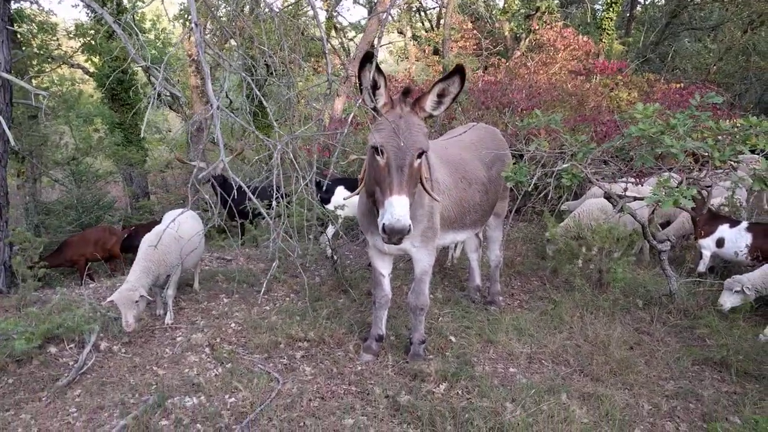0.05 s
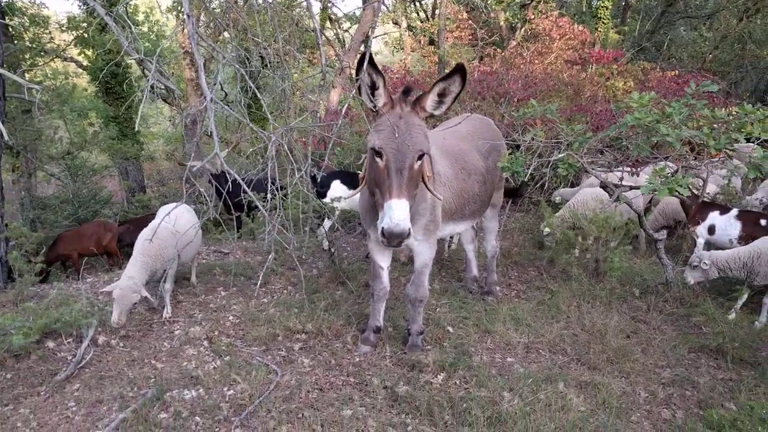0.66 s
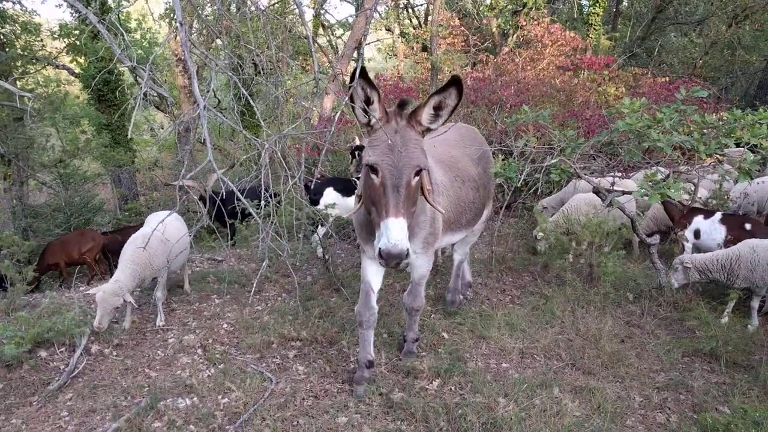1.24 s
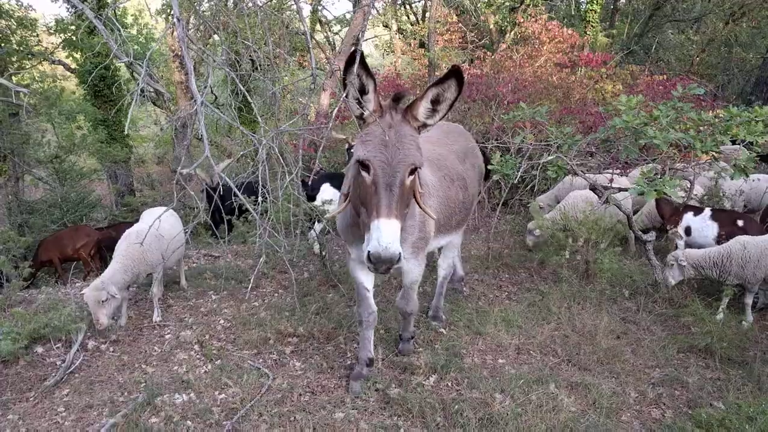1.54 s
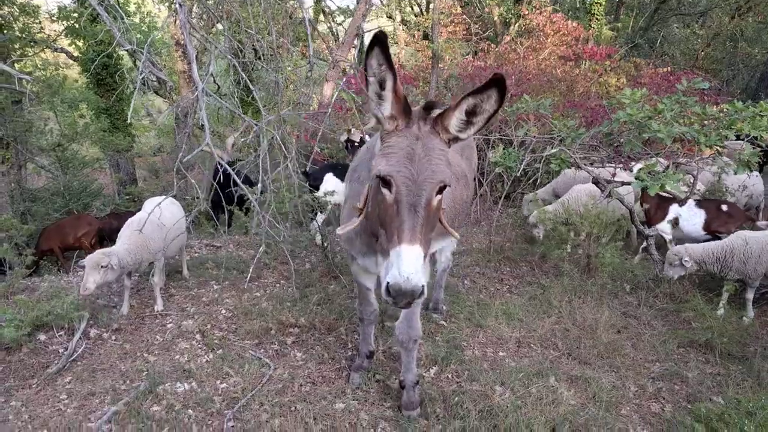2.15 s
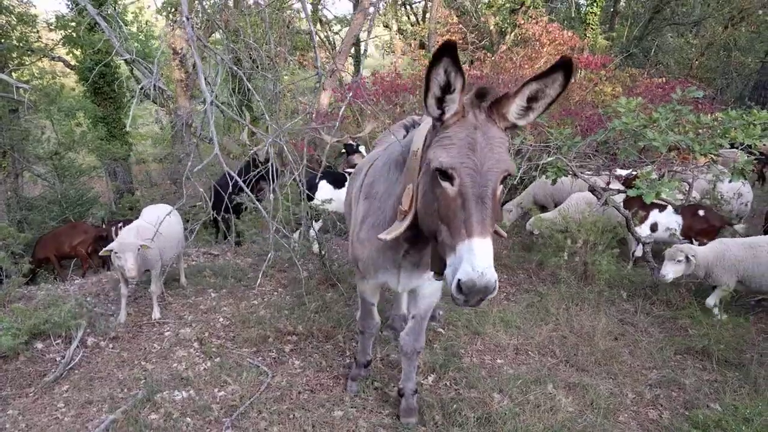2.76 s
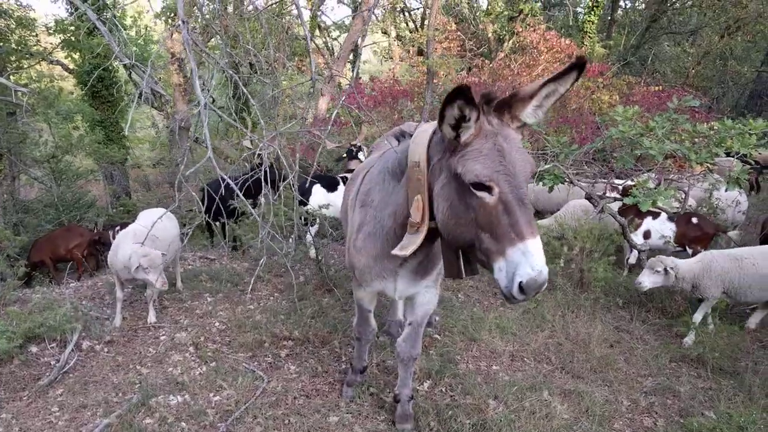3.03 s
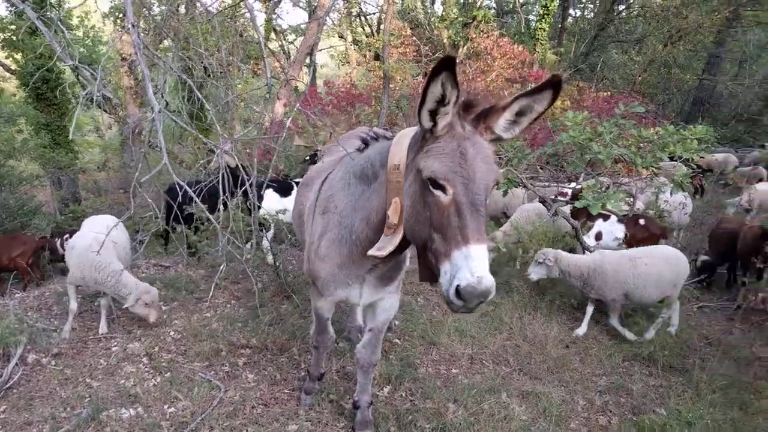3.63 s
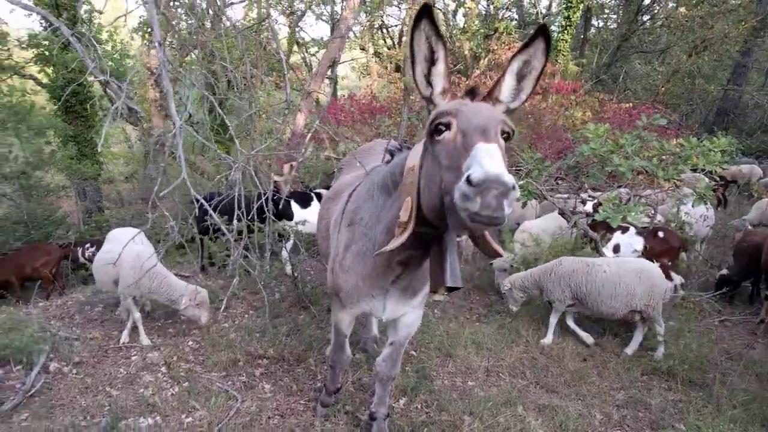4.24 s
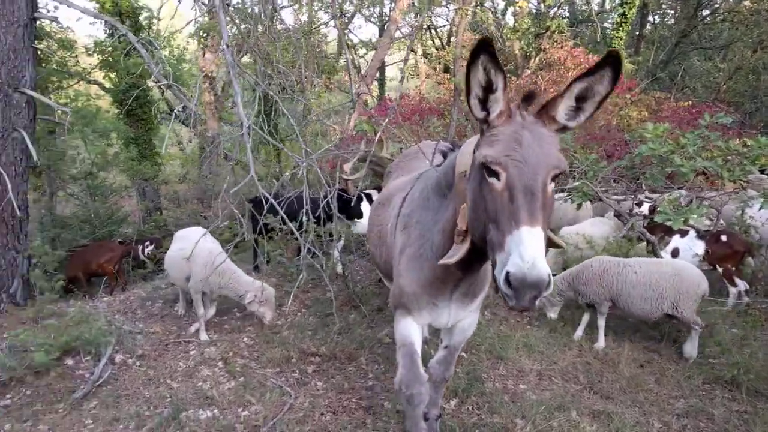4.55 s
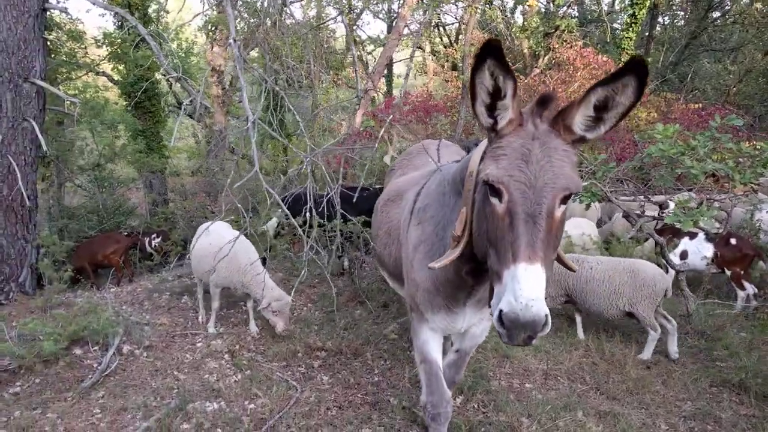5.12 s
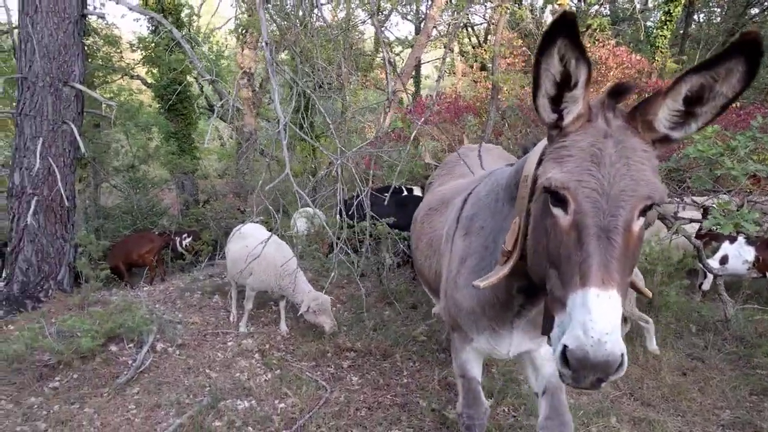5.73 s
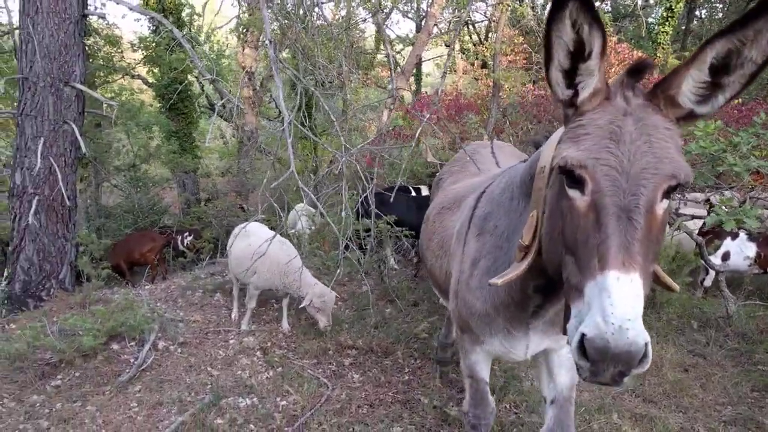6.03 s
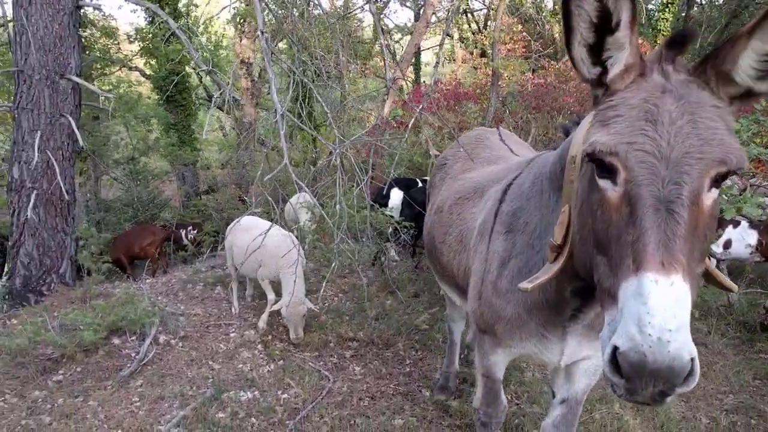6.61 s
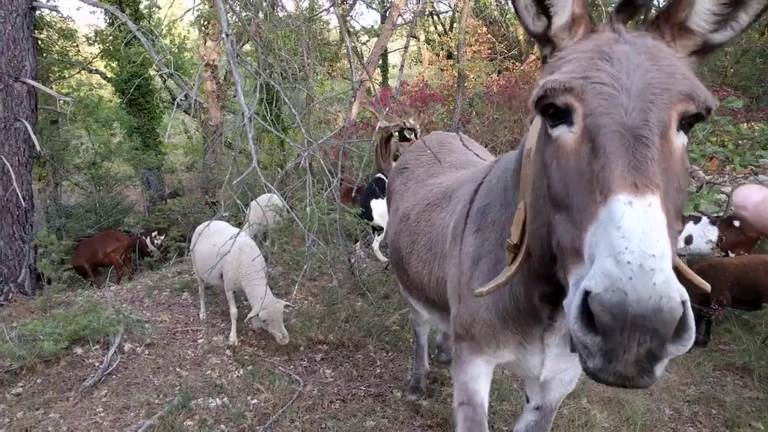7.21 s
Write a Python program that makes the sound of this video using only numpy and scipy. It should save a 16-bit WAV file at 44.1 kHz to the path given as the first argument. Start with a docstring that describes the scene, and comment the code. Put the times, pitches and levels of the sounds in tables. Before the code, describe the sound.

A herd grazes around the microphone in a wooded clearing. Small bright bells and hollow clonks sound first, then a donkey's sheet-metal bell joins close up, clanking irregularly until shortly before the end. Distant bells jangle among the trees, swelling and then thinning. Underneath runs a steady crisp rustle of dry leaves, broken by occasional hoof crunches, dull steps and sharp twig snaps.

```python
"""A wooded clearing, one microphone among a grazing herd. Close by, the clapper of a donkey's
sheet-iron bell clanks at every nod. Brighter goat and sheep bells ring near it, mixed with
low hollow clonks, and the rest of the flock jangles from among the trees.
Many hooves keep the dry leaves crackling, snap twigs and thud on the soil.
The trunks return a thin echo of the bells, and the wood murmurs in the distance."""
import sys
import numpy as np
from scipy import signal
from scipy.fft import rfft, irfft
from scipy.io import wavfile

SR = 44100
rng = np.random.default_rng(int(sys.argv[2]) if len(sys.argv) > 2 else 0)


def generate_wav(signal):
    """Clip the signal to [-1, 1] and save it as 16-bit WAV at the path in sys.argv[1]."""
    frames = np.transpose(np.atleast_2d(signal))
    scaled = np.clip(frames, -1, 1) * 32767
    pcm = np.round(scaled).astype(np.int16)
    wavfile.write(sys.argv[1], SR, pcm)


N = 325017
TIME = np.arange(N) / SR


# donkey bell modes by family (hollow note, knock, flat face, rim, waist, sheen): f/Hz, level/dB, t60/s
DONKEY_BELL_MODES = [
    [(463, .5, .34), (492, -1, .17), (515, -2, .12), (555, -5, .08), (640, -14, .12), (2401, -17, .42),
     (5459, -13, .26)],
    [(1399, 0, .25), (1424, -4, .22)],
    [(1997, -2, .62), (2713, -3, .55), (3171, -7, .42), (3548, 0, .26), (4732, -15, .42)],
    [(1093, -18, 1.7), (1330, 0, .42), (1890, -8, 3), (2961, -10, .7), (3957, -7, .8), (4856, -8, .7),
     (5590, -6, .7), (6826, -5, .42)],
    [(829, -6, .8), (1674, -17, .55), (5670, -3.5, .6), (7354, -2, .33)],
    [(4517, -22, .9), (7547, -2, .33), (8807, -21, .4), (12200, -22, .11)],
]
# clapper blows, whose landing point sets each family's drive: t/s, then level/dB per family
DONKEY_BELL_BLOWS = [(1.206, -32.5, -42, -55, -48, -45, -58), (1.381, -25, -38, -33.5, -50, -40, -29.5),
                     (1.497, -34, -33, -45, -58, -43, -38), (1.58, -45, -35, -45.5, -50, -60, -58),
                     (1.615, -66, -52, -65, -62, -71, -63), (2.236, -23.5, -40, -33.5, -38.5, -31.5, -30),
                     (2.446, -31, -33, -47.5, -47, -40, -42), (2.918, -27, -44, -40, -43.5, -31, -21),
                     (2.993, -35, -34.5, -47, -42.5, -40, -57), (3.324, -28, -34, -39.5, -39, -35.5, -16),
                     (3.528, -33, -46, -42.5, -42.5, -40, -28), (3.625, -32, -59, -58, -70, -51, -60),
                     (3.668, -30.5, -41, -58, -33, -31.5, -19.5), (4.088, -32, -30.5, -64, -46, -37, -44),
                     (4.122, -62, -33, -67, -71, -44, -60), (4.532, -32, -26.5, -44, -46, -43, -59),
                     (4.588, -31.5, -31.5, -46, -46, -36.5, -32), (4.728, -33.5, -46, -52, -44, -36, -32),
                     (4.89, -33, -41, -44, -53, -35, -38), (4.937, -35, -33, -54, -48, -40.5, -35),
                     (5.051, -37.5, -35.5, -54, -59, -46.5, -46), (5.273, -34.5, -42, -50, -56, -47.5, -51),
                     (5.833, -27.5, -43, -45, -61, -36, -28.5), (5.885, -36, -33.5, -60, -39, -37, -36),
                     (5.932, -42, -33, -48.5, -46.5, -42, -50), (6.179, -29, -41.5, -43, -51, -37.5, -33),
                     (6.223, -37, -34.5, -77, -59, -49, -53)]
# spectrum of the walls' dull clack: f/Hz, level/dB
CLACK_SPECTRUM = [(300, -25), (1400, -2), (3300, -4.5), (7000, -17)]

def donkey_bell(jangle_db=-35, jangle_growth=.5, hard_blow_db=-22, cutoff_hz=456):
    """Close up: the clapper rings the walls; a hard contact adds jangle, a flat one a dull clack."""
    walls = bell(DONKEY_BELL_MODES, DONKEY_BELL_BLOWS, scatter_db=1.5, choke_db=-15, swing_s=.4)
    # the bell is too small to radiate below the cutoff
    radiated = signal.sosfilt(signal.butter(4, cutoff_hz, "high", fs=SR, output="sos"), walls)
    # the jangle grows more slowly with force than the pure ring does
    hard_contacts = [(s, jangle_db + jangle_growth * (sheen - hard_blow_db))
                     for s, *_, sheen in DONKEY_BELL_BLOWS]
    flat_contacts = [(s, max(hollow, knock)) for s, hollow, knock, *_ in DONKEY_BELL_BLOWS]
    jangle = clapper(hard_contacts, tick_db=9, buzz_db=5, buzz_t60=.083)
    clack = clapper(flat_contacts, tick_db=-3, buzz_db=-1, buzz_t60=.12,
                    spectrum=CLACK_SPECTRUM, count=110)
    return radiated + jangle + clack


def bell(families, blows, scatter_db, choke_db, swing_s):
    """Each blow wakes the modes; a full swing first chokes the old ring, a quick rebound hardly does."""
    out, last_s = np.zeros(N), 0
    for s, *drives_db in blows:
        swing = np.clip((s - last_s) / swing_s, 0, 1)
        out *= np.interp(TIME, [s, s + .005], [1, undb(choke_db * swing)])
        last_s = s
        for modes, drive_db in zip(families, drives_db):
            for hz, db, t60 in modes:
                mode_db = db + drive_db + scatter_db * rng.standard_normal()
                add(out, s, ring(hz, mode_db, t60, phase_spread=.7))
    return out


# the clapper's contact as the microphone hears it: f/Hz, level/dB
IRON_AT_MIC = [(400, -6), (1000, 0.5), (3000, -4), (5000, 0), (6300, 9.5), (7300, 14.5), (8300, 8.5),
               (10000, -1.5), (16000, -18)]

def clapper(contacts, tick_db, buzz_db, buzz_t60, spectrum=IRON_AT_MIC, tick_s=.00099, count=56):
    """Iron meets iron at each contact (t/s, level/dB): a tick, then a buzz of crowded upper modes."""
    out, t = np.zeros(N), TIME[:SR // 2]
    crowd_hz = 1000 + 12000 * (np.arange(count) + rng.random(count)) / count
    for s, db in contacts:
        add(out, s, undb(db + tick_db) * np.exp(-t / tick_s) * rng.standard_normal(len(t)))
        for hz in crowd_hz:
            add(out, s, ring(hz, db + buzz_db, buzz_t60) * rng.standard_normal() / np.sqrt(count))
    return colour(out, spectrum)


# goat bell modes by family (hum, middle, upper ring): f/Hz, level/dB, t60/s
GOAT_BELL_MODES = [
    [(1218, -1, 1.7), (1351, -5, .7), (2068, -4, .6)],
    [(2359, 0, .85), (3171, -14, .7)],
    [(4057, -2, .7), (4095, 3, .7), (4198, -4, .7), (5770, -1, .4), (6263, 0, .6), (7187, 6, .38),
     (8780, 0, .27)],
]
# clapper blows: t/s, then level/dB per family
GOAT_BELL_BLOWS = [(0.816, -51, -52, -57), (2.207, -56, -46, -57), (2.498, -50.5, -42, -50),
                   (2.759, -51.5, -49.5, -68), (3.171, -44.5, -44, -45.5), (3.303, -43, -34.5, -41.5),
                   (4.375, -54, -45, -55), (4.584, -50, -41, -47), (5.089, -40.5, -50, -41.5),
                   (5.306, -41.5, -46, -46), (5.505, -45, -39.5, -46), (5.68, -51.5, -37.5, -41.5)]

def goat_bell():
    """Near the microphone: one long-ringing bell; each blow chokes the old ring and starts a new one."""
    walls = bell(GOAT_BELL_MODES, GOAT_BELL_BLOWS, scatter_db=2.5, choke_db=-20, swing_s=.1)
    contacts = [(s, upper) for s, *_, upper in GOAT_BELL_BLOWS]
    return walls + clapper(contacts, tick_db=16.5, buzz_db=10, buzz_t60=.13)


# three small bells, each with modes (f/Hz, level/dB, t60/s) and blows (t/s, level/dB)
SMALL_BELL_MODES_AND_BLOWS = [ ([(1303, -10, 1.1), (1846, -9, .4), (2665, -9, 1.0), (3300, -10, 1.1),
                              (4226, -6, .35), (4355, 1, .45), (5642, 0, .33), (7171, 9, .15),
                              (9400, 0, .12)], [(0.0, -44.5), (.22, -40), (.268, -36), (4.483, -47.5)]),
                              ([(1520, -4, 1.35), (1670, -3, 0.74), (2844, -4, 0.56), (4250, -7.5, 1.26),
                              (5170, -6, 0.66), (6420, 10, 0.24), (7130, 15.5, 0.2)], [(.813, -45.5),
                              (1.068, -52.5), (1.289, -44), (4.414, -44), (6.957, -44)]), ([(1996, -16, 1),
                              (2885, -8, 0.62), (5000, -9, 0.24), (4750, -0.5, 0.52), (7120, 9.5, 0.22)],
                              [(4.212, -44), (6.793, -40.5), (7.27, -44.5)])]

def small_bells():
    """Also nearby: light bells whose modes keep the same balance from blow to blow."""
    walls, contacts = np.zeros(N), []
    for modes, blows in SMALL_BELL_MODES_AND_BLOWS:
        contacts += blows
        for s, blow_db in blows:
            for hz, db, t60 in modes:
                add(walls, s, ring(hz, db + blow_db, t60))
    return walls + clapper(contacts, tick_db=8, buzz_db=3.5, buzz_t60=.27)


# low hollow clonks of the herd's bells, many sounding with the nearby small bells' blows:
# f/Hz, t60/s, head tosses (t/s, level/dB)
HOLLOW_NOTES = [ (398.5, 0.27, [(.553, -46), (3.83, -40.5), (5.358, -32), (6.425, -42)]),
                (512.3, 0.18, [(0.0, -39), (.38, -39.5), (.445, -41), (6.795, -35.5)]),
                (599, 0.11, [(1.067, -36), (1.29, -30.5), (3.193, -32.5), (3.299, -28.5), (4.375, -35),
                (4.42, -33.5), (5.472, -26), (6.803, -31.5), (6.958, -39), (7.27, -31.5)]),
                (628, 0.073, [(.218, -25), (.247, -39), (.297, -33.5), (.811, -24), (.858, -34.5),
                (.935, -34), (2.503, -34), (5.679, -21)]), (890, 0.13, [(.069, -33), (.153, -34),
                (.445, -36), (2.04, -44.5), (2.07, -40), (2.305, -36.5), (2.668, -30.5), (2.81, -40),
                (2.949, -37), (3.248, -35), (3.62, -37), (3.81, -29), (4.482, -36), (4.81, -35.5),
                (6.031, -38), (6.11, -35), (6.57, -45), (6.693, -37.5)])]

def hollow_clonks(count=14, trim_db=-.5, graze_db=-44, spread_db=8, db_per_octave=5):
    """The bells' hollow notes clonk loudly at a toss of the head, softly at random while grazing."""
    out = np.zeros(N)
    modes = [(1, 0), (1.035, -8), (1.9, -22)]  # note, close twin, overtone: ratio, level/dB
    swell_s = .0038  # the air inside takes a moment to swing up
    middle_hz = np.mean([hz for hz, *_ in HOLLOW_NOTES])
    for hz, t60, tosses in HOLLOW_NOTES:
        jitter, force = rng.random((count, 2)).T
        graze_times = TIME[-1] * (np.arange(count) + jitter) / count
        tilt_db = db_per_octave * np.log2(hz / middle_hz)
        soft_db = graze_db + spread_db * (force - .5) + bunching_db(graze_times) + tilt_db
        for s, db in [*tosses, *zip(graze_times, soft_db)]:
            for ratio, mode_db in modes:
                add(out, s, ring(hz * ratio, db + trim_db + mode_db, t60, swell_s))
    return out


# single clear bell partials that ring on, some from the donkey's bell: t/s, f/Hz, level/dB, t60/s
CLEAR_PARTIALS = [(.53, 1035, -53, .6), (.55, 1885, -58, 2.4), (.86, 3171, -55, 1.3),
                  (2.29, 1715, -42, .55), (3.172, 2245, -50, .8), (3.41, 1003, -48, .5),
                  (4.533, 2962, -49, .45), (5.36, 3460, -52, .55)]

def chimes(gain_db=7.5):
    """Single partials swell quickly and sing on through the clatter."""
    out = np.zeros(N)
    for s, hz, db, t60 in CLEAR_PARTIALS:
        add(out, s, ring(hz, db + gain_db, t60, rise_s=.0046))
    return out


def far_flock(count=260, clonk_db=-49, tinkle_db=-60):
    """Far among the trees: bells jangle at random, each a low clonk with four high partials."""
    out = np.zeros(N)
    for k, (jitter, pitch, nearness, *partials) in enumerate(rng.random((count, 7))):
        s = TIME[-1] * (k + jitter) / count
        db = 8 * (nearness - .5) + bunching_db(s)
        add(out, s, ring(480 + 500 * pitch, clonk_db + db, t60=.19, rise_s=.0018))
        for height in partials:
            add(out, s, ring(1400 * 4.3 ** height, tinkle_db + db, t60=.79, rise_s=.00051))
    return out


def bunching_db(s, peak_s=3.75, width_s=1.56, strayed_db=-11):
    """Level of the herd at time s against its loudest moment, when it bunches up."""
    return strayed_db * (1 - np.exp(-.5 * ((s - peak_s) / width_s) ** 2))


# twigs snapping: t/s, peak level/dB
TWIG_SNAPS = [(1.592, -22), (1.666, -16), (1.761, -22), (2.333, -20), (5.04, -18), (5.095, -8.5),
              (5.154, -20), (6.257, -13.5), (6.266, -23), (6.433, -21.5)]
# snaps and crunches, coloured by the microphone's resonance near 7.2 kHz: f/Hz, level/dB
CRUNCH_AT_MIC = [(300, -35), (2000, -22), (4000, -6), (5200, 0), (6400, 8.5), (7200, 14), (8200, 6),
                 (10000, -1), (16000, -9.5)]

def twigs(break_s=.0012):
    """On the clearing floor: each twig breaks within a millisecond or two."""
    out, t = np.zeros(N), TIME[:SR // 50]
    for s, db in TWIG_SNAPS:
        fracture = rng.standard_normal(len(t)) * np.exp(-t / break_s)
        snap = colour(fracture, CRUNCH_AT_MIC)
        add(out, s, snap * undb(db) / np.abs(snap).max())
    return out


# leaf rustle, coloured by the microphone's resonance near 7.2 kHz: f/Hz, level/dB
RUSTLE_AT_MIC = [(300, -22.5), (1500, -32), (3000, -21.5), (4500, -14.5), (5600, -12.5), (6500, -5),
                 (7250, 1.5), (7900, -5), (8800, -12), (10500, -17), (13000, -22.5), (16000, -23)]
# course of the litter's rustle: t/s, level/dB
RUSTLE_LEVELS = [(0.0, -39), (0.49, -42), (2.38, -38), (2.52, -41), (2.75, -41.5), (3.4, -37.5),
                 (4.29, -41.5), (5.01, -37.5), (6.16, -39), (6.38, -40.5), (6.69, -42), (6.96, -37.5),
                 (7.37, -37.5)]
# hooves pressing on leaves: centre t/s, level/dB, half-length/s
HOOF_CRUNCHES = [(1.276, -36.5, 0.027), (1.965, -28.5, 0.012), (1.994, -32.5, 0.01), (4.004, -36.5, 0.02),
                 (4.751, -34, 0.01), (5.888, -27.5, 0.013), (6.271, -35, 0.019), (6.753, -37.5, 0.018),
                 (6.936, -33, 0.0055), (7.074, -29.5, 0.0084)]

def leaves(hiss_gain=2.15, flutter_db=1.47):
    """The litter rustles under the whole herd; hooves near the microphone crush it in bursts."""
    fractures = crackle(per_s=2500, spread_db=4.9) + hiss_gain * rng.standard_normal(N)
    rustle = unit(colour(fractures, RUSTLE_AT_MIC))
    crush = unit(colour(crackle(per_s=3700, spread_db=2.8), CRUNCH_AT_MIC))
    pressure = sum(undb(db) * np.exp(-.5 * ((TIME - s) / half) ** 2) for s, db, half in HOOF_CRUNCHES)
    stir_db = np.interp(TIME, *np.transpose(RUSTLE_LEVELS)) + flutter_db * wander(per_s=22)
    return rustle * undb(stir_db) + crush * pressure


def crackle(per_s, spread_db):
    """Dense tiny fractures of very uneven size, rms 1."""
    breaks = rng.random(N) < per_s / SR
    size = np.minimum(rng.exponential(size=N), 5)
    polarity = np.sign(rng.standard_normal(N))
    return unit(breaks * undb(spread_db * size) * polarity)


# hooves on the soil: t/s, f/Hz, level/dB, t60/s
HOOF_THUDS = [(0.9, 88, -49, 0.34), (1.521, 96.6, -35, 0.12), (1.663, 462, -29, 0.016),
              (4.382, 196, -30, 0.031), (6.298, 194, -47, 0.1)]

def hoof_falls():
    """At ground level: the soil answers a hoof with one dull, damped note."""
    out = np.zeros(N)
    for s, hz, db, t60 in HOOF_THUDS:
        add(out, s, ring(hz, db, t60, rise_s=.0015))
    return out


def trunks(x, echo_db, t60, delay_s=.008):
    """The surrounding trees scatter sound back to the microphone."""
    t = TIME[:SR]
    response = rng.standard_normal(SR) * undb(-60 * t / t60) * (t > delay_s)
    return undb(echo_db) * signal.fftconvolve(x, response / np.linalg.norm(response))[:N]


# spectrum of the distant wood: f/Hz, level/dB
MURMUR_SPECTRUM = [(20, -20), (40, -26), (65, 6), (110, 3), (170, -1), (330, -10), (550, 1.5), (900, -11.5),
                   (1500, -2.5), (3000, -3), (8000, -24)]

def wood_murmur(level_db=-57, drift_db=.8):
    """Behind everything: the wood's low murmur, drifting slightly in level."""
    murmur = unit(colour(rng.standard_normal(N), MURMUR_SPECTRUM))
    return murmur * undb(level_db + drift_db * wander(per_s=1.85))


def ring(hz, db, t60, rise_s=.0002, phase_spread=1):
    """One decaying mode; it builds up over rise_s plus one cycle."""
    t = TIME[:int(max(t60, .01) * SR)]
    attack = -np.expm1(-t / (rise_s + 1 / hz))
    cycles = hz * t + phase_spread * rng.random()
    return undb(db - 60 * t / t60) * attack * np.sin(2 * np.pi * cycles)


def colour(x, spectrum, size=4096):
    """Causal filter with the given outline (f/Hz, level/dB)."""
    hz, db = np.transpose(spectrum)
    f = np.fft.rfftfreq(2 * size, 1 / SR)
    gain = undb(np.interp(np.log(f + 1), np.log(hz), db))
    cepstrum = irfft(np.log(gain))
    fold = np.r_[1, np.full(size - 1, 2)]  # gives minimum phase
    response = irfft(np.exp(rfft(cepstrum[:size] * fold, 2 * size)))
    return signal.fftconvolve(x, response[:size])[:len(x)]


def wander(per_s):
    """Random drift, spread near 1, with per_s turning points a second."""
    return np.interp(TIME * per_s, np.arange(1000), rng.standard_normal(1000))


def undb(db):
    """Decibels to gain."""
    return 10 ** (np.asarray(db) / 20)


def unit(x):
    """Scale to rms 1."""
    return x / np.sqrt(np.mean(x ** 2))


def add(out, s, x):
    """Mix x into out from time s on."""
    i = max(int(s * SR), 0)
    out[i:i + len(x)] += x[:max(N - i, 0)]


def scene():
    """All bells and hooves in the clearing, in mono."""
    near = donkey_bell() + goat_bell() + small_bells()
    herd = hollow_clonks() + chimes() + far_flock()
    echo = trunks(near, echo_db=-12, t60=.4) + trunks(herd, echo_db=-7, t60=.5)
    return (near + herd + echo + twigs() + leaves() + wood_murmur() + hoof_falls())[None]


def record(dry):
    """The recorder cuts the top treble steeply."""
    top_hz = 15900
    return signal.sosfilt(signal.ellip(10, .2, 70, top_hz, fs=SR, output="sos"), dry)


dry = scene()
out = record(dry)
generate_wav(out)
```